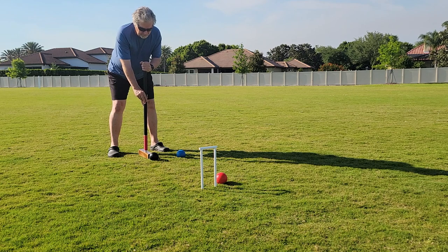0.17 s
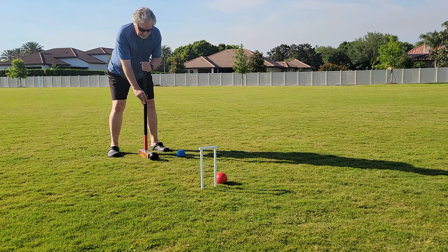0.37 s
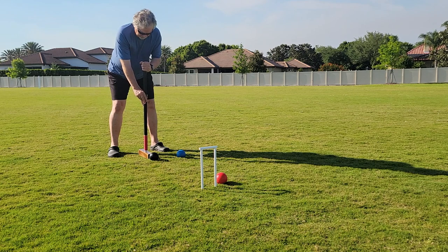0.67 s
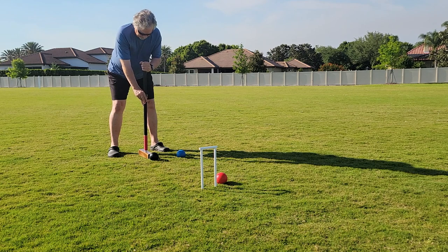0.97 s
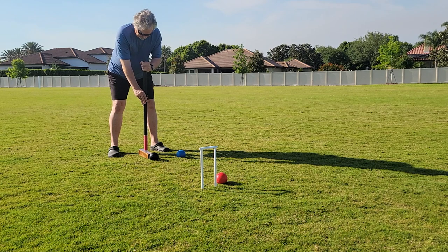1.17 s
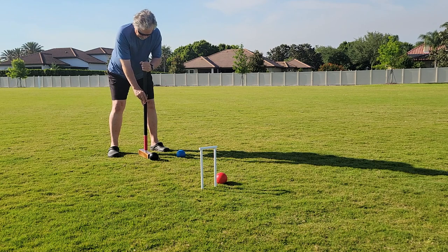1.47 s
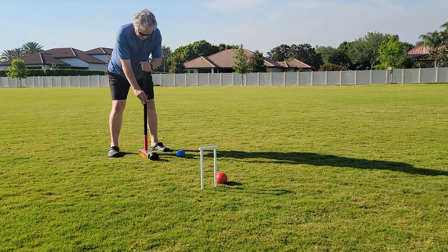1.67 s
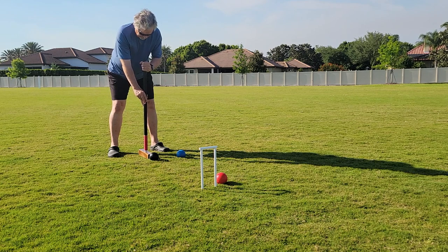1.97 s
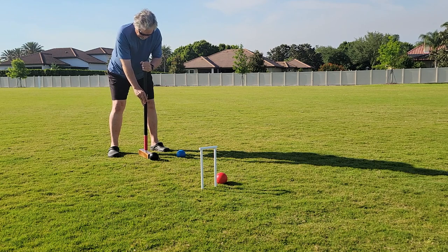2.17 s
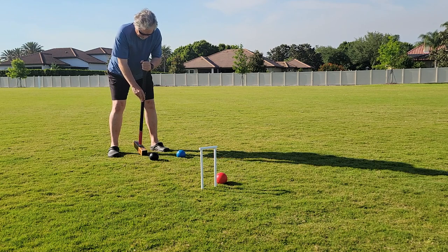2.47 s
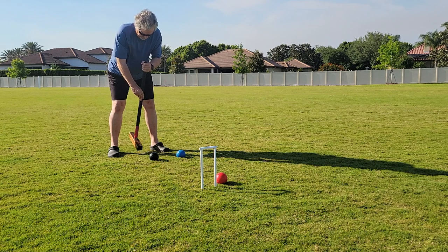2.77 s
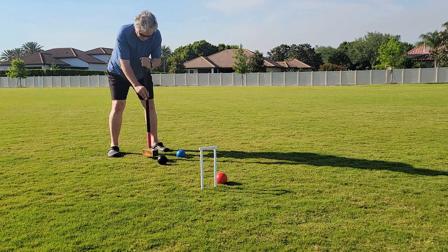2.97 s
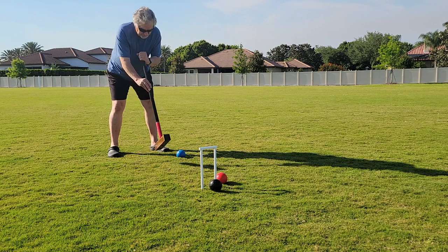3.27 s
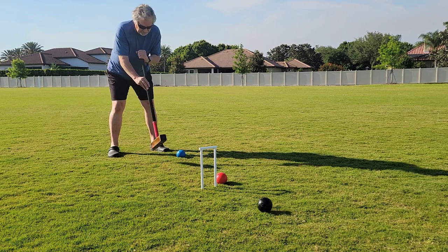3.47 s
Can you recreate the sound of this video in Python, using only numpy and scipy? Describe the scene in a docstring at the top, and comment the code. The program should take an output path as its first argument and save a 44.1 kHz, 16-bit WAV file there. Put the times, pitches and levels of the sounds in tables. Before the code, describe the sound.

A croquet mallet strikes a ball with one loud, dry woody knock near the end, followed almost at once by a much softer ball-on-ball click; before it, low wind buffets the microphone on an open lawn.

```python
"""A wooden mallet knocks a croquet ball on an open lawn; a third of a second later ball clicks on ball.
Each blow sums a short pressure pulse, a weaker later one, damped modes and quickly dying scattered noise.
Wind on the microphone is low-frequency noise of uneven level, with single soft bumps.
Far off, an insect is narrow-band noise and a bird is short falling sine notes.
A faint hush, a thin hiss and small rustles are shaped noise."""
import sys
import numpy as np
from scipy import signal
from scipy.fft import rfft, irfft
from scipy.io import wavfile

SR = 44100
rng = np.random.default_rng(int(sys.argv[2]) if len(sys.argv) > 2 else 0)


def unload_audio(sound):
    """Save the sound as a 16-bit wav file, at the path given as the first command line argument."""
    columns = np.transpose(np.atleast_2d(sound))
    # keep every value between -1 and 1, then stretch to whole-number steps
    steps = np.round(np.clip(columns, -1, 1) * 32767)
    wavfile.write(sys.argv[1], SR, steps.astype(np.int16))


N = 159201
T = np.arange(N) / SR

# Distant outdoor hush, spectrum: frequency_hz, relative_db
AIR_SPECTRUM = [(240, -32.5), (400, -16), (616, -11), (814, -9.5), (1040, -9), (1630, -14), (2090, -17.5),
                (2590, -21), (3070, -22), (16000, -49)]
# Slow change of the hush about its base level: time_s, change_db
AIR_SWING = [(0, 3), (1.0, 2), (1.9, 0.5), (2.9, 3)]
AIR_BASE_DB = -71
# Thin hiss, level before its random wander: time_s, level_db
HISS_LEVEL = [(2.94, -105), (2.97, -77.5), (3.02, -62), (3.08, -56), (3.135, -77), (3.2, -63.5),
              (3.35, -66.5), (3.41, -70), (3.45, -70.5), (3.6, -67.5)]
# Thin hiss, spectrum: frequency_hz, relative_db
HISS_SPECTRUM = [(3500, -9), (5500, -9.5), (8000, -2.5), (10500, -5), (14000, 0.5), (16000, 5.5)]

# Far insect: times in s, centre and width of the upper band in Hz, level before wander in dB
TRILL_START_S, TRILL_END_S, TRILL_FADE_S = 0.0, 0.9, 0.19
TRILL_HZ, TRILL_WIDTH_HZ, TRILL_DB = 2845, 320, -70.5
# Notes of the far bird: start_s, mid_note_pitch_hz, crest_rms_db
BIRD_NOTES = [(.178, 1040, -69), (.425, 1950, -75), (0.487, 1030, -63), (0.789, 1000, -64),
              (0.835, 1356, -71), (1.148, 1310, -72)]
NOTE_LENGTH_S, NOTE_FALL_HZ_PER_S = 0.053, 200

# Deepest part of the wind, level before panning: time_s, level_db
DEEP_LEVEL = [(0, -44.5), (.95, -50), (1.15, -50.5), (1.3, -41.5), (1.5, -47), (2.2, -41), (2.7, -43),
              (3.1, -38.5), (3.6, -40.5)]
# Deepest part of the wind, spectrum: frequency_hz, relative_db
DEEP_SPECTRUM = [(18, -17), (48, 2.5), (65, 0), (110, -25.5), (400, -85.5)]
# Wind rumble, level before offset, wander and panning: time_s, level_db
RUMBLE_LEVEL = [(0.0, -37.5), (0.42, -41.5), (0.74, -33), (0.77, -37), (0.97, -31), (1.14, -44),
                (1.26, -37), (1.32, -28), (1.35, -39.5), (1.85, -38), (1.96, -49.5), (2.0, -38.5),
                (2.19, -34.5), (2.24, -45.5), (2.52, -35.5), (2.66, -47.5), (3.2, -32), (3.27, -50),
                (3.33, -30.5), (3.6, -42.5)]
# Wind rumble, spectrum: frequency_hz, relative_db
RUMBLE_SPECTRUM = [(30, -21.5), (65, 2.5), (90, 3), (130, -0.5), (180, -10.5), (250, -22), (400, -42),
                   (800, -90.5)]
# Wind flutter, level before offset, wander and panning: time_s, level_db
FLUTTER_LEVEL = [(0, -55.5), (.16, -49.5), (.42, -58), (.85, -50), (1.0, -55), (1.18, -65.5), (1.32, -65),
                 (1.45, -73), (1.7, -68.5), (1.95, -66.5), (2.17, -56.5), (2.5, -63.5), (2.85, -84.5),
                 (3.1, -59), (3.6, -60.5)]
# Wind flutter, spectrum: frequency_hz, relative_db
FLUTTER_SPECTRUM = [(80, -13.5), (170, 10), (260, 1), (400, -7), (700, -17.5), (1500, -41), (3000, -44),
                    (8000, -64)]
# Soft bumps on the microphone: start_s, peak_db (before panning)
BUMPS = [(0.098, -32), (0.143, -29.5), (.187, -33.5), (.492, -44.5), (0.633, -35), (0.827, -33),
         (0.969, -35), (1.32, -37.5), (1.618, -38.5), (2.111, -39), (2.174, -41.5), (2.335, -42.5),
         (2.5, -44)]
# Pressure pulse of one bump, spectrum: frequency_hz, relative_db
BUMP_SPECTRUM = [(30, -9), (110, 5.5), (250, 2.5), (500, -12), (900, -28), (2000, -38), (6000, -73.5)]
# Side from which the wind strikes: time_s, left_minus_right_db
WIND_PAN = [(1.05, 1.5), (1.3, -9), (1.5, -1.5), (1.7, -9), (3.6, -11)]

# Faint ticks, peeps and rustles: start_s, crest_rms_db (before panning), centre_hz, width_hz, length_s
RUSTLES = [(0.056, -50.5, 685, 450, 0.01), (1.058, -69.5, 2930, 2970, 0.044),
           (2.471, -76.5, 5250, 1990, 0.062), (2.769, -67, 7120, 160, 0.015), (2.818, -74, 4950, 150, .05),
           (3.144, -68, 4970, 1800, 0.03), (3.351, -70, 4940, 201, 0.03), (3.406, -55.5, 665, 686, 0.027),
           (3.487, -62.5, 1610, 2240, 0.064)]

# Left-right likeness of the scattered sound: frequency_hz, correlation
SCATTER_LIKENESS = [(300, 0.91), (1000, 0.016), (2000, -0.073), (4800, -0.41), (9000, 0.35), (15000, -0.14)]
FAR_TAIL_CUT_HZ = 2300  # late returns lose their treble

# Ball on ball: onset in s, pulse peak in dB; its echo: delay in s, peak in dB
CLICK_S, CLICK_DB = 3.2677, -27
CLICK_ECHO_S, CLICK_ECHO_DB = 0.009, -35
# Click pulse, spectrum: frequency_hz, relative_db
CLICK_PULSE = [(150, -44), (350, 5.5), (800, 3.5), (1750, 8.5), (2500, -32), (4200, -24), (6000, -21),
               (8000, -30), (11000, -40), (14500, -28)]
# Damped modes of the click: frequency_hz, initial_level_db, t60_s
CLICK_MODES = [(344, -44, 0.094), (793, -39.5, 0.044), (925, -42, 0.062), (1125, -42.5, 0.074),
               (1780, -48.5, 0.061), (3210, -45.5, 0.021), (4430, -55, .04)]
# Scatter of the click, spectrum: frequency_hz, relative_db
CLICK_SCATTER = [(250, 10.5), (800, 3.5), (1700, -2), (2500, -11.5), (3400, -12), (4500, -15), (5500, -24),
                 (8000, -24), (14000, -57)]

# Mallet on ball: onset in s, lag of the right ear in s, delay of the duller second pulse in s
KNOCK_S, KNOCK_LAG_S, SECOND_DELAY_S = 2.9551, 0.00008, 0.0087
# Peaks of the two pulses before panning, in dB
KNOCK_DB, SECOND_DB = 0.5, -10
# First knock pulse, spectrum: frequency_hz, relative_db
KNOCK_PULSE = [(120, -16), (320, 4.5), (500, 8), (900, 5), (1600, 0), (2300, -3), (3100, -14.5),
               (3600, -21.5), (4600, -12), (6500, -29), (8600, -34), (15000, -44.5)]
# Second knock pulse, spectrum: frequency_hz, relative_db
SECOND_PULSE = [(300, -23.5), (700, -5), (1220, 7), (1650, 2.5), (2200, -21.5), (3600, -22.5),
                (5000, -19.5), (15000, -53.5)]
# Bright crack of the contact, spectrum: frequency_hz, relative_db
CRACK_SPECTRUM = [(1000, -23.5), (3500, -31.5), (4800, 8), (6500, -23), (8600, 8.5), (11000, -17.5),
                  (13000, 1), (16000, -11)]
# Damped modes of mallet and ball: frequency_hz, initial_level_db (before panning), t60_s
KNOCK_MODES = [(489, -25, .04), (775, -22.5, 0.072), (925, -23.5, .055), (1137, -23, 0.073),
               (1523, -26, .04), (1766, -25.5, 0.073), (2310, -38, 0.026), (2788, -46, 0.072),
               (3100, -27.5, 0.028), (4660, -43, 0.014), (5190, -38, .033), (5360, -42.5, 0.029),
               (8710, -37.5, 0.043)]
# Scatter of the knock, spectrum: frequency_hz, relative_db
KNOCK_SCATTER = [(200, 0.5), (500, -2), (1000, 5), (1750, 2.5), (2300, -7), (3000, -6.5), (3600, -24),
                 (4500, -5.5), (5400, -12.5), (6500, -19.5), (8600, -17), (11000, -24.5), (15000, -32)]


def from_db(db):
    """Amplitude ratio: 20 dB is a factor of ten."""
    return 10 ** (np.asarray(db) / 20)


def rms_one(x):
    """Normalisation by the root of the mean power."""
    return x / np.sqrt(np.mean(x ** 2) + 1e-20)


def over_time(rows):
    """Linear interpolation of a table over time."""
    return np.interp(T, *np.transpose(rows))


def level(rows):
    """Amplitude envelope, linear in decibels between its points."""
    return from_db(over_time(rows))


def at_hz(points, hz):
    """Interpolation on a logarithmic frequency axis."""
    f, value = np.transpose(points)
    return np.interp(np.log(hz + 1), np.log(f), value)


def panned(x, pan_db):
    """Interchannel level difference: left exceeds right by pan_db."""
    return x * from_db(np.array([[0.5], [-0.5]]) * pan_db)


def drift(hz):
    """Low-pass random process: noise halved in amplitude at hz, with rms 1."""
    f = np.fft.rfftfreq(N, 1 / SR)
    return rms_one(irfft(rfft(rng.standard_normal(N)) / (1 + (f / hz) ** 2), N))


def noise(spectrum, alike):
    """Partly coherent stereo noise, rms 1: mid and side weights set the left-right correlation."""
    f = np.fft.rfftfreq(N, 1 / SR)
    # alike is one correlation or a table over frequency
    correlation = np.clip(alike if np.isscalar(alike) else at_hz(alike, f), -1, 1)
    mid, side = rfft(rng.standard_normal((2, N))) * from_db(at_hz(spectrum, f))
    mid = np.sqrt(1 + correlation) * mid
    side = np.sqrt(1 - correlation) * side
    return rms_one(irfft(mid + side * [[1], [-1]], N))


def band(hz, width_hz):
    """Resonance-shaped noise, rms 1: width_hz is the full width at half amplitude."""
    f = np.fft.rfftfreq(N, 1 / SR)
    resonance = 1 / (1 + (2 * (f - hz) / width_hz) ** 2)
    return rms_one(irfft(rfft(rng.standard_normal((2, N))) * resonance, N))


def swell(start, length):
    """Half-sine envelope: a smooth rise and fall."""
    return np.sin(np.pi * np.clip((T - start) / length, 0, 1))


def pulse(start, spectrum, size=4096):
    """Minimum-phase pulse, peak 1: a folded cepstrum makes the given spectrum causal."""
    magnitude = from_db(at_hz(spectrum, np.fft.rfftfreq(size, 1 / SR)))
    cepstrum = irfft(np.log(magnitude))
    cepstrum[1:size // 2] *= 2
    cepstrum[size // 2:] = 0
    shape = irfft(np.exp(rfft(cepstrum)))
    shape = shape / np.abs(shape).max()
    return np.interp((T - start) * SR, np.arange(size), shape, left=0, right=0)


def decay(start, t60):
    """Exponential decay from 1: the amplitude falls 60 dB in t60 seconds."""
    return (T >= start) * np.exp(-np.log(1000) * np.clip((T - start) / t60, 0, 10))


def ring(start, modes):
    """Modal superposition: a blow sets off damped sines."""
    return sum(from_db(db) * decay(start, t60) * np.sin(2 * np.pi * hz * (T - start))
               for hz, db, t60 in modes)


def scatter(start, spectrum, near_db, near_t60, far_db, far_t60):
    """Diffuse scattering: a short burst from close by and a weaker, duller, longer tail."""
    near = noise(spectrum, SCATTER_LIKENESS)
    far = noise(spectrum, SCATTER_LIKENESS)
    far = signal.sosfilt(signal.butter(2, FAR_TAIL_CUT_HZ, fs=SR, output="sos"), far)
    near_burst = from_db(near_db) * decay(start, near_t60) * near
    far_tail = from_db(far_db) * decay(start, far_t60) * far
    return near_burst + far_tail


def air():
    """Diffuse ambience: nearly uncorrelated stereo noise forms the distant hush."""
    return from_db(AIR_BASE_DB) * level(AIR_SWING) * noise(AIR_SPECTRUM, alike=0.038)


def hiss():
    """Amplitude-modulated treble noise: a thin hiss rises around the knock and wavers."""
    wander = from_db(2 * drift(25))
    return panned(level(HISS_LEVEL) * wander * noise(HISS_SPECTRUM, alike=0.062), pan_db=3.5)


def insect():
    """Narrow-band noise: a trill in two bands, the lower weaker, of randomly wavering level."""
    fade = np.clip(np.minimum(T - TRILL_START_S, TRILL_END_S - T) / TRILL_FADE_S, 0, 1)
    envelope = from_db(TRILL_DB + 1.4 * drift(40)) * fade
    upper = band(TRILL_HZ, TRILL_WIDTH_HZ)
    lower = from_db(-7.5) * band(hz=2100, width_hz=380)
    return envelope * (upper + lower)


def bird():
    """Frequency modulation: soft sine notes glide downward with a small random waver."""
    waver_hz = 24 * drift(90)
    notes = 0
    for start, hz, db in BIRD_NOTES:
        fall_hz = NOTE_FALL_HZ_PER_S * (T - start - NOTE_LENGTH_S / 2)
        phase = 2 * np.pi * np.cumsum(hz + waver_hz - fall_hz) / SR
        notes = notes + from_db(db) * swell(start, NOTE_LENGTH_S) * np.sqrt(2) * np.sin(phase)
    return notes


def bumps():
    """Impulsive pressure: short dull puffs at the microphone."""
    return sum(from_db(db) * pulse(start, BUMP_SPECTRUM) for start, db in BUMPS)


def wind():
    """Turbulent pressure at the microphone: three noise bands and bumps, shifting mainly to the right."""
    deep = level(DEEP_LEVEL) * noise(DEEP_SPECTRUM, alike=0.23)
    # the constants are level offsets in dB, the factors on drift its spread in dB
    rumble_wander = from_db(-1.5 + 3.5 * drift(20))
    rumble = level(RUMBLE_LEVEL) * rumble_wander * noise(RUMBLE_SPECTRUM, alike=0.87)
    flutter_wander = from_db(2.5 + 3.07 * drift(32))
    flutter = level(FLUTTER_LEVEL) * flutter_wander * noise(FLUTTER_SPECTRUM, alike=0.54)
    return panned(deep + rumble + flutter + bumps(), over_time(WIND_PAN))


def rustles():
    """Band-limited noise bursts: faint ticks, peeps and brushes of grass swell briefly."""
    return sum(from_db(db) * swell(start, length) * band(hz, width)
               for start, db, hz, width, length in RUSTLES)


def click():
    """Impact of ball on ball: a pulse excites damped modes; an echo and scatter follow."""
    # minus signs set the polarity
    direct = -from_db(CLICK_DB) * pulse(CLICK_S, CLICK_PULSE) - ring(CLICK_S, CLICK_MODES)
    echo = -from_db(CLICK_ECHO_DB) * pulse(CLICK_S + CLICK_ECHO_S, CLICK_PULSE)
    around = scatter(CLICK_S + 0.0009, CLICK_SCATTER,
                     near_db=-36, near_t60=0.087, far_db=-41.5, far_t60=0.12)
    return direct + echo + around


def lagged_pulse(start, spectrum):
    """Interaural time difference: the pulse reaches the right ear slightly later."""
    return np.array([pulse(start + lag, spectrum) for lag in (0, KNOCK_LAG_S)])


def knock():
    """Impact of mallet on ball: two pulses, a bright contact crack, damped modes and scatter."""
    first = from_db(KNOCK_DB) * lagged_pulse(KNOCK_S, KNOCK_PULSE)
    second = from_db(SECOND_DB) * lagged_pulse(KNOCK_S + SECOND_DELAY_S, SECOND_PULSE)
    crack = from_db(-25.5) * decay(KNOCK_S + 0.0004, t60=0.012) * noise(CRACK_SPECTRUM, SCATTER_LIKENESS)
    modes = -ring(KNOCK_S, KNOCK_MODES)
    around = scatter(KNOCK_S + 0.0015, KNOCK_SCATTER,
                     near_db=-18.0, near_t60=0.07, far_db=-28.5, far_t60=0.11)
    pulses = panned(first, pan_db=0.5) + panned(second, pan_db=-4.0)
    return pulses + panned(crack, pan_db=5) + panned(modes, pan_db=-0.5) + around


def scene():
    """Linear superposition: the two blows over wind and a quiet lawn."""
    hush = air()
    thin_hiss = hiss()
    blows = knock() + click()
    surroundings = wind() + insect() + bird()
    lawn = panned(hush + rustles(), pan_db=-2.5)
    return blows + surroundings + thin_hiss + lawn


def record(dry):
    """Amplitude limiting and band limiting: peaks are clipped, then the extreme treble is removed."""
    ceiling = 0.83
    # 70 dB of rejection from 16700 Hz upward
    treble_cut = signal.cheby2(16, 70, 16700, fs=SR, output="sos")
    return signal.sosfilt(treble_cut, np.clip(dry, -ceiling, ceiling))


dry = scene()
out = record(dry)
unload_audio(out)
```